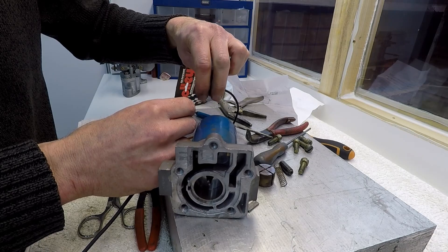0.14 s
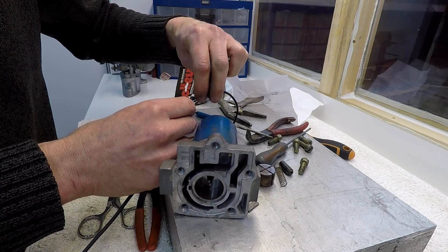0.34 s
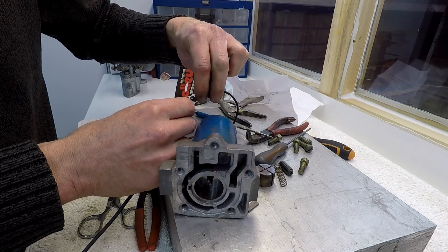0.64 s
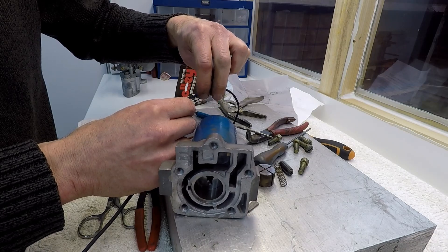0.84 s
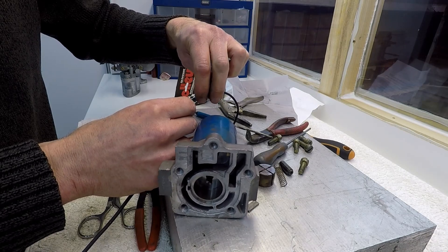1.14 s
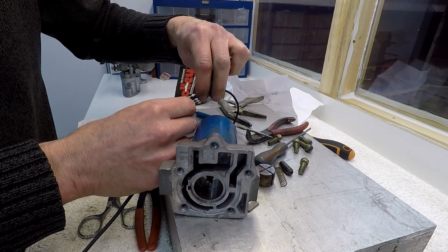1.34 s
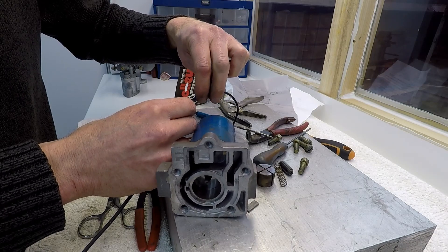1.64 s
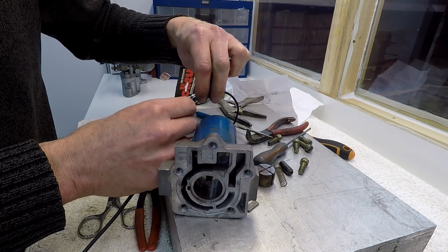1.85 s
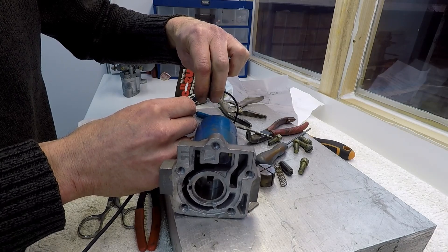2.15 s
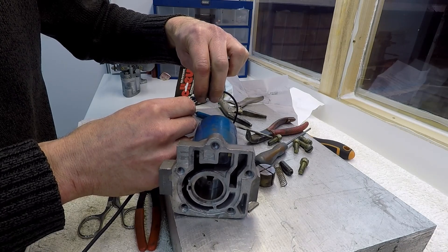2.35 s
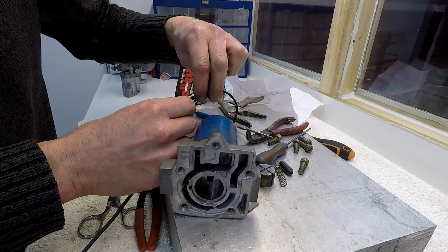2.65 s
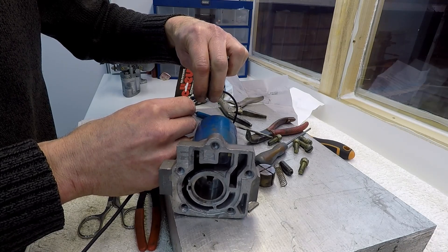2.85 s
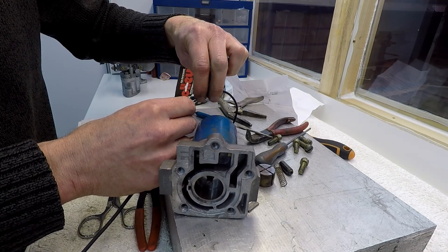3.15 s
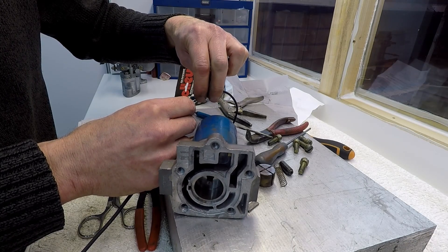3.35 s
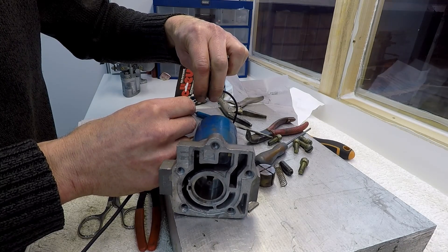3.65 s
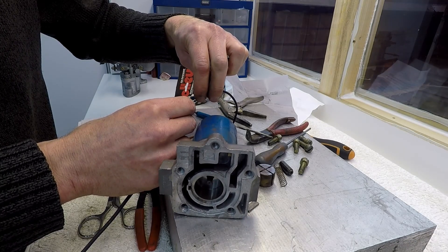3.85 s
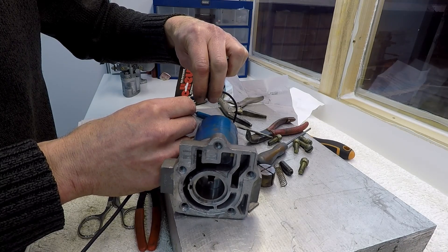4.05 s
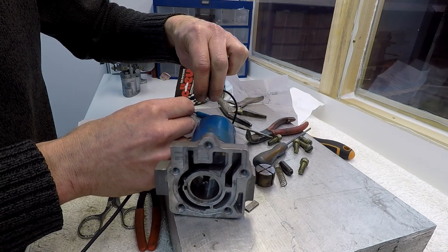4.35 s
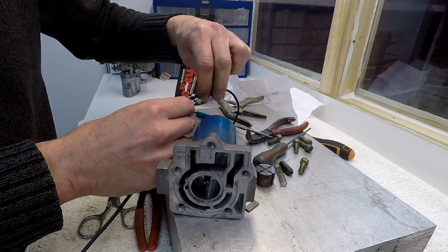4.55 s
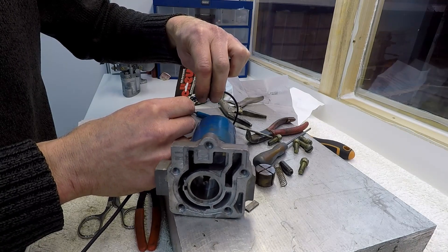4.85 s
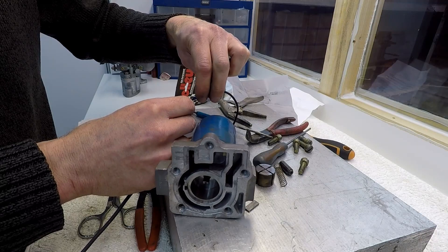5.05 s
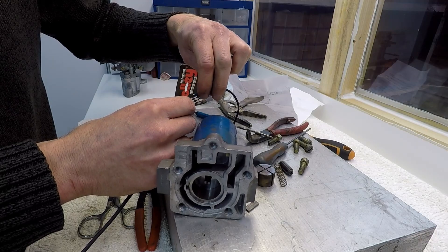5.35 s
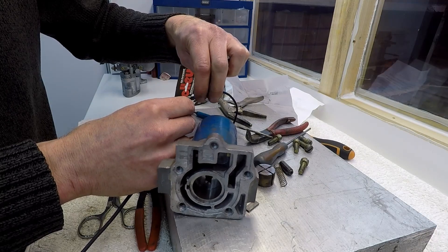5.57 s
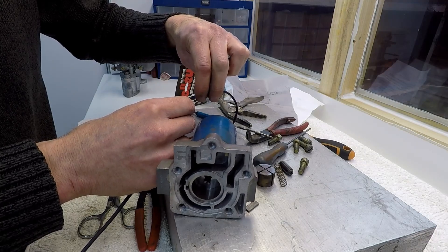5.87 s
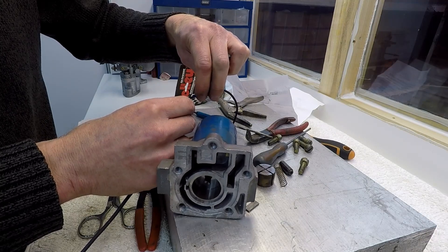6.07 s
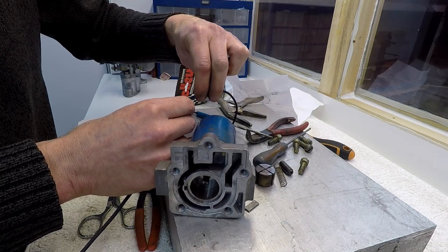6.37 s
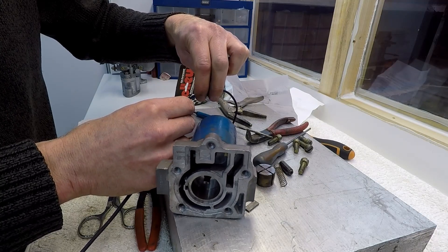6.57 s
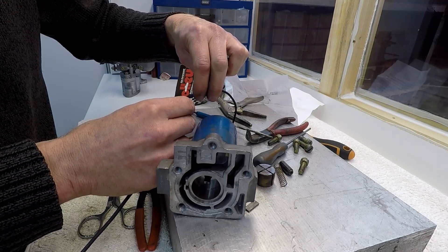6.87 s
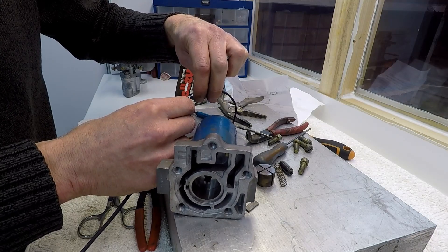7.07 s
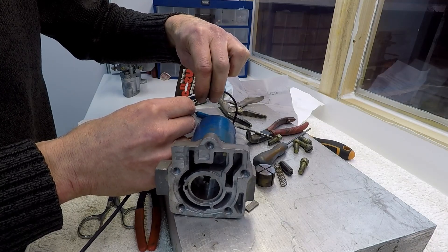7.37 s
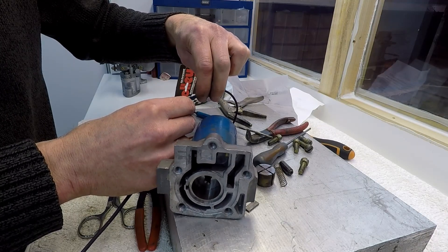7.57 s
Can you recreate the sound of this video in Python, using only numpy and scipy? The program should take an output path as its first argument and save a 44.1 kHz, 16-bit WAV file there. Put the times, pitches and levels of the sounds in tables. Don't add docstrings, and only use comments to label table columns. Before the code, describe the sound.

In a quiet workshop with low rumble, a small cast-metal motor is briefly powered on a bench. A dull thump and short raspy spin come first, then another, then a steady bright whir of about two and a half seconds. Rapid stuttering bursts follow, then spaced double zips. Every start and stop makes the housing thump and clack. Close microphone on the same bench, short room tail.

```python
import sys
import numpy as np
from scipy import signal
from scipy.fft import rfft, irfft
from scipy.io import wavfile
from scipy.ndimage import uniform_filter1d

SR = 44100
rng = np.random.default_rng(int(sys.argv[2]) if len(sys.argv) > 2 else 0)


def store_wav(level_fs):
    pcm = np.round(np.clip(np.atleast_2d(level_fs), -1, 1) * 32767)
    wavfile.write(sys.argv[1], SR, pcm.T.astype(np.int16))


def field_ratio(decibels):
    return 10 ** (np.asarray(decibels, dtype=float) / 20)


N = 340011
TIME = np.arange(N) / SR
HZ = np.arange(N // 2 + 1) * SR / N
OPPOSITE = np.array([[1], [-1]])


def level(x, db):
    return x * field_ratio(db) / np.sqrt(np.mean(x ** 2))


def shape(table):
    hz, db = np.transpose(table)
    return np.interp(np.log(HZ + 1), np.log(hz + 1), db)


def coloured(table):
    spectrum = rfft(rng.standard_normal(N)) * field_ratio(shape(table))
    return level(irfft(spectrum, N), 0)


def strike(times, db, modes, scatter_db, push_s):
    at = (np.asarray(times) * SR).astype(int)
    luck = rng.standard_normal((len(at), len(modes)))
    ringing = 0
    for k, (hz, mode_db, t60) in enumerate(modes):
        blows = np.zeros(N, complex)
        blows[at] = field_ratio(db + mode_db + scatter_db * luck[:, k])
        pole = np.exp(2j * np.pi * hz / SR - np.log(1000) / (t60 * SR))
        ringing = ringing + signal.lfilter([1], [1, -pole], blows).imag
    push = np.hanning(int(push_s * SR) + 3)
    return signal.lfilter(push / push.sum(), [1], ringing)


# f/Hz, level/dB per Hz
AIR_SHARED = [(100, -3), (205, 9.5), (260, -1), (500, -9.5), (1000, -14.5), (2000, -19), (4200, -25),
              (6500, -21.5), (10000, -26), (12500, -33.5), (14500, -38)]
# f/Hz, level/dB per Hz
AIR_APART = [(20, -21.5), (60, -33), (150, -18.5), (400, -23), (1000, -25.5), (2000, -36.5), (4200, -50),
             (6500, -42), (10000, -45.5), (12500, -54.5), (14500, -60)]
# t/s, f/Hz, level/dB
FAR_MACHINE = [
    (6.55, 345.6, -70),
    (6.686, 346, -44),
    (6.8, 346, -48),
    (6.862, 347, -57),
    (6.916, 352, -55.5),
    (7.15, 347, -53.5),
]


def workshop():
    s, hz, db = np.transpose(FAR_MACHINE)
    gain = np.interp(TIME, s, field_ratio(db - 1.5), 0, 0)
    turns = np.cumsum(np.interp(TIME, s, hz)) / SR
    hum = uniform_filter1d(gain, size=2000) * np.sin(2 * np.pi * turns)
    shared = coloured(AIR_SHARED) * field_ratio(-48.5)
    apart = OPPOSITE * coloured(AIR_APART) * field_ratio(-48.5)
    return shared + apart + hum


# t/s, level/dB
RUMBLE_SWELL = [(0.0, -28), (0.1, -26), (0.23, -36.5), (0.41, -25), (0.94, -29), (1.09, -20.5), (1.2, -32),
                (1.76, -24), (2.15, -28.5), (2.45, -24.5), (3.91, -40), (4.66, -31), (4.81, -37),
                (4.94, -23), (5.07, -40), (5.56, -27), (7.54, -35.5), (7.71, -32)]
# start t/s, end t/s, camera sway level/dB, bench top level/dB
ROCKING_SPELLS = [(0.0, 0.14, -22.5, -31), (0.388, 0.73, -17.5, -24.5), (0.98, 1.34, -21.5, -33),
                  (1.6, 2.006, -19.5, -26), (2.38, 2.66, -30.5, -34), (4.053, 4.242, -38, -32.5),
                  (4.25, 4.548, -26.5, -31), (4.6, 4.86, -38, -41), (4.895, 5.207, -22.5, -31),
                  (5.547, 5.947, -21.5, -34), (6.19, 6.578, -21, -32.5), (7.204, 7.4, -23.5, -33),
                  (7.456, 7.615, -37, -38.5)]


def rocking(rise_s=0.027, sag_db_s=10, fade_db_s=75, kick_db=-2.5, kick_fade_db_s=60):
    rest = field_ratio(np.interp(TIME, *np.transpose(RUMBLE_SWELL)))
    sway = (rest * field_ratio(-18)) ** 2
    boom = (rest * field_ratio(-11)) ** 2
    rumble = rest ** 2
    for start, end, sway_db, boom_db in ROCKING_SPELLS:
        age = np.clip(TIME - start, 0, None)
        over = np.clip(TIME - end, 0, None)
        rise = 1 - np.exp(-age / rise_s)
        spell = rise * field_ratio(-sag_db_s * age - fade_db_s * over)
        sway = sway + (spell * field_ratio(sway_db)) ** 2
        boom = boom + (spell * field_ratio(boom_db)) ** 2
        rumble = rumble + (rise * field_ratio(sway_db + kick_db - kick_fade_db_s * age)) ** 2
    return np.sqrt([sway, boom, rumble])


# f/Hz, level/dB per Hz
RUMBLE_COLOUR = [(12, -42), (22, -28), (33, -1.5), (45, 0.5), (60, -3.5), (75, -22.5), (140, -20),
                 (250, -50), (500, -82)]
# f/Hz, level/dB per Hz
BOOM_COLOUR = [(45, -45), (70, -14.5), (85, 8.5), (100, -3.5), (160, -11.5), (250, -27.5), (600, -35),
               (1500, -102)]


def lows(boom, swell, apart_db=-12):
    deep = coloured([(10, -20), (22, 18), (35, -10), (60, -38), (200, -88)]) * field_ratio(apart_db)
    rumble = (coloured(RUMBLE_COLOUR) + OPPOSITE * deep) * swell
    return rumble + coloured(BOOM_COLOUR) * boom * field_ratio(-3.0)


# t/s, shell ring level/dB, mount thud level/dB
THUMPS = [(0.079, -28, -51), (0.412, -24, -30), (0.492, -21.5, -31), (0.564, -23.5, -30),
          (0.606, -27.5, -23), (1.03, -28, -40), (1.077, -19.5, -38), (1.141, -20, -36),
          (1.295, -22.5, -36), (1.326, -23.5, -29), (1.648, -23, -27), (1.941, -26, -44), (2.45, -24, -36),
          (4.058, -20.5, -32.5), (4.137, -22, -24), (4.19, -15, -27.5), (4.24, -27, -20.5),
          (4.304, -17.5, -25), (4.37, -19.5, -24.5), (4.931, -19, -31), (5.018, -20.5, -25.5),
          (5.146, -26, -49), (5.598, -20, -25), (5.686, -18.5, -30), (5.832, -22.5, -50), (6.27, -17, -22),
          (6.501, -23.5, -39), (7.202, -32, -38), (7.275, -14.5, -24), (7.366, -18.5, -30)]
# t/s, peak level/dB, bright part level/dB, favoured f/Hz of the landing corner
HOUSING_CLACKS = [(0.099, -43, -49, 870), (0.442, -27, -36.5, 530), (0.467, -42, -44.5, 633),
                  (0.562, -34.5, -37, 724), (0.636, -35, -44, 560), (0.74, -38.5, -47.5, 790),
                  (1.14, -34, -38.5, 744), (1.326, -37, -46, 762), (1.694, -25, -30, 550),
                  (1.793, -32.5, -41, 725), (1.97, -35, -47, 756), (2.464, -36, -43, 760),
                  (4.135, -29.5, -30, 550), (4.189, -32, -39.5, 560), (4.213, -31, -41.5, 550),
                  (4.302, -34.5, -34.5, 649), (4.333, -34.5, -46, 501), (4.37, -43, -50, 721),
                  (4.393, -39.5, -60, 744), (4.477, -31.5, -36, 710), (4.649, -41.5, -62, 501),
                  (5.016, -32, -36.5, 566), (5.188, -34, -47.5, 875), (5.685, -30, -33, 544),
                  (5.861, -36.5, -46.5, 697), (6.222, -34.5, -49, 501), (6.345, -31.5, -28.5, 716),
                  (6.524, -38, -40.5, 850), (7.362, -32, -27.5, 800)]
# f/Hz, level/dB, t60/s
SHELL_MODES = [(307, 0, .25), (372, -6, .12), (265, -11, .08)]


def camera_shell(hum):
    thump_s, thump_db, _ = np.transpose(THUMPS)
    clack_s, clack_db = np.transpose(HOUSING_CLACKS)[:2]
    thumps = strike(thump_s, thump_db - 0.5, SHELL_MODES, 0.82, push_s=0.0019)
    knocks = strike(clack_s, clack_db + 4, SHELL_MODES, 2.0, push_s=0.0017)
    return thumps + knocks + hum


# f/Hz, level/dB, t60/s
MOUNT_MODES = [(205.6, 5, 0.24), (168.7, 0.5, 0.28), (129, -15.5, 0.04)]
# f/Hz, level/dB per Hz
SWAY_COLOUR = [(25, -35), (48, -1.5), (65, 16), (90, 12.5), (110, -0.5), (160, -7), (230, -31), (400, -34),
               (900, -98)]


def camera_mount(sway):
    thump_s, _, thump_db = np.transpose(THUMPS)
    clack_s, clack_db = np.transpose(HOUSING_CLACKS)[:2]
    thuds = strike(thump_s, thump_db + 8.5, MOUNT_MODES, 1, push_s=0.0069)
    knocks = strike(clack_s, clack_db - 8.5, MOUNT_MODES, 1.7, push_s=0.0055)
    return thuds + knocks + coloured(SWAY_COLOUR) * sway


def shaking(hum, sway, shell_left=1.075, mount_left=0.68, lag_s=0.00024):
    shell = camera_shell(hum)
    mount = camera_mount(sway)
    late = np.interp(TIME - lag_s, TIME, shell)
    left = shell_left * shell + mount_left * mount
    right = (shell_left - 2) * late + (mount_left - 2) * mount
    return np.array([left, right])


# f/Hz, level/dB, t60/s
HOUSING_LOW_MODES = [(544, 4, 0.062), (700, 0, 0.015), (747, 2.5, 0.053), (835, 0, 0.092),
                     (1050, -7, 0.038)]
# f/Hz, level/dB, t60/s
HOUSING_HIGH_MODES = [(1240, 0.5, 0.06), (1446, 0.5, 0.04), (1770, 9.5, 0.026), (1975, 15, 0.015),
                      (2200, -19, .025), (2290, 0, 0.051), (3450, -29, 0.024)]
# f/Hz, level/dB, t60/s
THIN_WALL = [(2923, -17, .18)]


def clacks(crack_db=-3, crack_s=0.015, falloff_db=18, bright_hz=1450, pan_db=-10.5):
    s, low_db, high_db, low_hz = np.transpose(HOUSING_CLACKS)
    body = strike(s, high_db, THIN_WALL, 0.55, push_s=0.0003)
    for mode in HOUSING_LOW_MODES:
        loss_db = falloff_db * abs(np.log2(mode[0] / low_hz))
        body = body + strike(s, low_db - 5.5 - loss_db, [mode], 1.0, push_s=0.0009)
    for mode in HOUSING_HIGH_MODES:
        loss_db = falloff_db * abs(np.log2(mode[0] / bright_hz))
        body = body + strike(s, high_db - 7 - loss_db, [mode], 1.4, push_s=0.00046)
    hits = np.zeros(N)
    hits[(s * SR).astype(int)] = field_ratio(high_db + crack_db)
    contact = np.hanning(90) / 45
    puff = signal.lfilter(contact, [1, -np.exp(-1 / (crack_s * SR))], hits)
    crack = puff * coloured([(300, 2), (800, -7.0), (2200, -19.5), (4000, -32.0), (6000, -38), (14000, -71)])
    return (body + crack) * field_ratio(OPPOSITE * pan_db / 2)


# on t/s, off t/s, level/dB at
# first, level/dB at last
SCRAPE_SPELLS = [(0.361, 0.425, -40.5, -35.5), (0.958, 1.007, -45, -35), (1.589, 4.05, -36.5, -39),
                 (4.057, 4.075, -46, -37), (4.107, 4.13, -34, -38.5), (4.139, 4.163, -40, -36),
                 (4.172, 4.194, -49, -41), (4.308, 4.341, -41, -41), (4.331, 4.37, -53, -53.5),
                 (4.821, 4.856, -44, -38), (4.863, 4.894, -35, -39.5), (5.476, 5.505, -48, -47.5),
                 (5.505, 5.534, -44, -36.5), (5.543, 5.566, -55, -43.5), (6.155, 6.19, -42.5, -39.5),
                 (6.197, 6.224, -33, -39), (7.163, 7.18, -48, -44.5), (7.189, 7.22, -39.5, -36.5),
                 (7.232, 7.258, -48, -47)]


def effort(rise_s=0.0086, coast_s=0.014):
    gain = np.zeros(N)
    for on, off, first_db, last_db in SCRAPE_SPELLS:
        rise = (1 - np.exp(-np.clip(TIME - on, 0, 1) / rise_s)) ** 3
        coast = np.exp(-np.clip(TIME - off, 0, 1) / coast_s)
        held = field_ratio(np.interp(TIME, [on, off], [first_db, last_db]))
        gain = np.maximum(gain, rise * coast * held)
    return gain


# t/s, turns a second
SHAFT_SPEED = [
    (0, 45.6),
    (1.6, 42.3),
    (2.1, 43.8),
    (2.45, 44.2),
    (2.6, 43.9),
    (2.9, 44.3),
    (4, 44.4),
    (7.71, 47.7),
]
SCRAPE_PULSES = [(1, .24), (3, .12), (5, .06), (6, .08), (7, .16), (12, .12)]


def brush_scrape(turns, repeat=.975, fresh=.2):
    grain = rng.standard_normal((int(turns[-1]) + 9, 1024))
    surface = signal.lfilter([1], [1, -repeat], grain, axis=0)
    ripples = rfft(surface, axis=1)
    surface = irfft(ripples / np.abs(ripples) ** .75, axis=1)
    scrape = surface.ravel()[np.round(turns * 1024).astype(int)]
    scrape = scrape / np.std(scrape) + fresh * rng.standard_normal(N)
    lead = rng.uniform(0, 2 * np.pi, len(SCRAPE_PULSES))
    beat = sum(depth * np.cos(2 * np.pi * k * turns + a) for (k, depth), a in zip(SCRAPE_PULSES, lead))
    return scrape * np.exp(beat)


# f/Hz, width/Hz, level/dB
CASING_MODES = [(2851, 30, -8), (3200, 80, -13), (3592, 30, -7), (3800, 60, -10), (4080, 80, -8),
                (4500, 130, -8), (5260, 80, -10), (5495, 60, -7), (5835, 70, -5), (6065, 120, 1),
                (6335, 110, -1), (6585, 100, 1), (6800, 60, -6), (6920, 70, -8), (7100, 50, -10),
                (7440, 90, -10), (7810, 60, -20), (8880, 150, -15), (9780, 130, -20), (10300, 90, -20),
                (13700, 200, -32)]
# f/Hz, level/dB per Hz
CASING_RADIATION = [(500, -17.5), (1000, -16), (2500, -13), (3300, -4.5), (4550, -3), (4800, -15.5),
                    (5600, -1), (6200, -13), (6700, 4.5), (7300, -8), (10300, -15.5), (12600, -19.5),
                    (13300, -23), (14500, -51)]
# f/Hz, difference minus sum level/dB, its phase/rad
PORT_BALANCE = [(1000, 4, 2.5), (2000, -5, 1.4), (3020, -12, 2.1), (4500, -48, 2.8), (5000, -3, 2.24),
                (6540, -5, 1.38), (7500, -1.5, 1.42), (8700, 3.5, 2.44), (10200, -0.5, 2.26),
                (11400, -18, 1.6), (14400, 7, 1.6)]


def casing(scrape, modes_db=10.0, spread_s_per_khz=.004):
    modes = sum(field_ratio(db + modes_db) ** 2 / (1 + (2 * (HZ - hz) / width) ** 4) for hz, width, db in CASING_MODES)
    colour = np.sqrt(field_ratio(shape(CASING_RADIATION)) ** 2 + modes)
    delay = np.exp(-1j * np.pi * spread_s_per_khz * HZ ** 2 / 1000)
    ports = np.array(PORT_BALANCE)
    apart = field_ratio(shape(ports[:, :2])) * np.exp(1j * shape(ports[:, ::2]))
    mid = rfft(scrape) * colour * delay
    return irfft(mid * (1 + OPPOSITE * apart), N) / np.std(irfft(mid, N))


# times a turn, level/dB
ROTOR_HUM = [(1, -42), (2, -49), (3, -56), (5, -51), (6, -55), (7, -48)]


def motor():
    turns = np.cumsum(np.interp(TIME, *np.transpose(SHAFT_SPEED))) / SR
    sound = casing(brush_scrape(turns))
    hum = sum(field_ratio(db) * np.sin(2 * np.pi * k * turns) for k, db in ROTOR_HUM)
    speed = effort()
    return sound * speed * field_ratio(1.5), hum * speed * field_ratio(40)


def room(x, t60_s=0.25, tail_db=-9.5):
    t = TIME[:SR // 2]
    tail = rng.standard_normal((2, len(t))) * field_ratio(-60 * t / t60_s) * (t > .002)
    tail *= field_ratio(tail_db) / np.sqrt(np.sum(tail[0] ** 2))
    return x + signal.fftconvolve(x.mean(axis=0)[None], tail, axes=1)[:, :N]


def scene():
    sway, boom, swell = rocking()
    scrape, hum = motor()
    airborne = room(scrape + clacks())
    return workshop() + lows(boom, swell) + shaking(hum, sway) + airborne


def low_pass(x):
    return signal.sosfilt(signal.butter(12, 14870, fs=SR, output="sos"), x)


def record(dry):
    return low_pass(dry)


dry = scene()
out = record(dry)
store_wav(out)
```